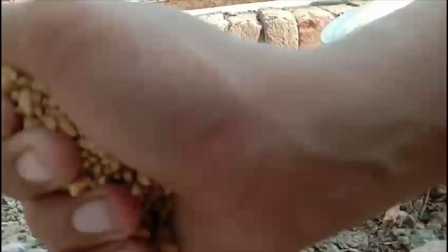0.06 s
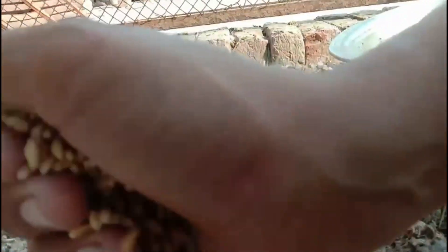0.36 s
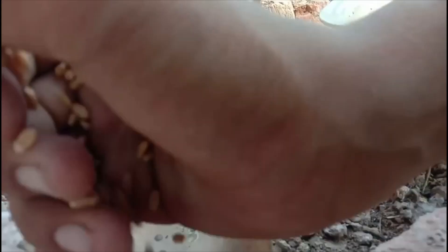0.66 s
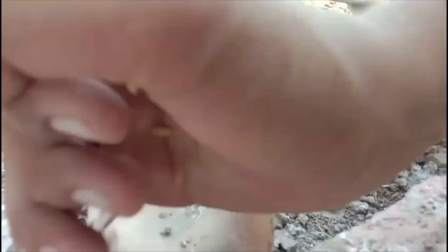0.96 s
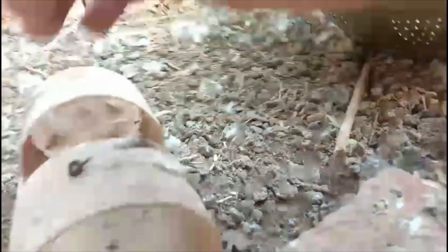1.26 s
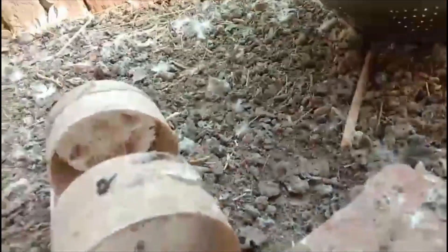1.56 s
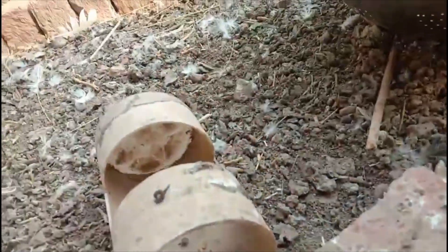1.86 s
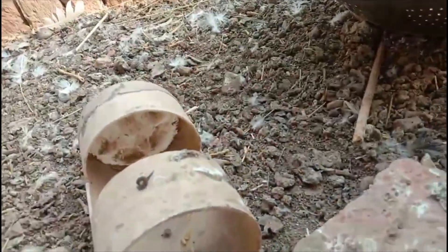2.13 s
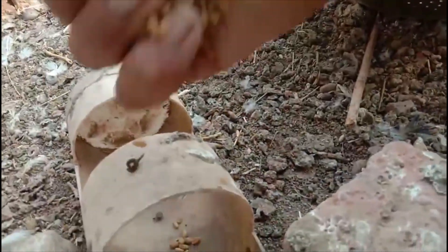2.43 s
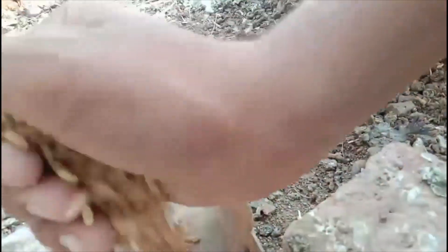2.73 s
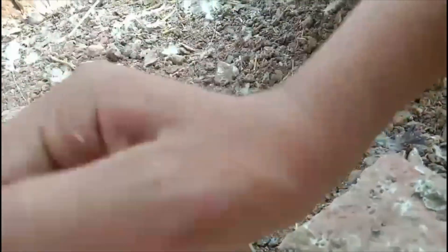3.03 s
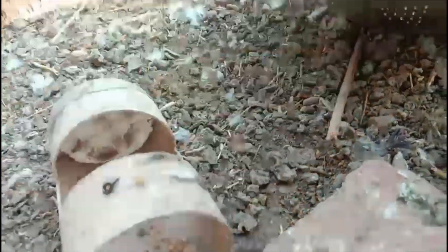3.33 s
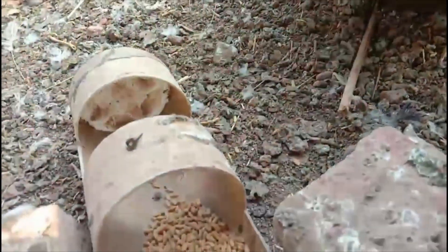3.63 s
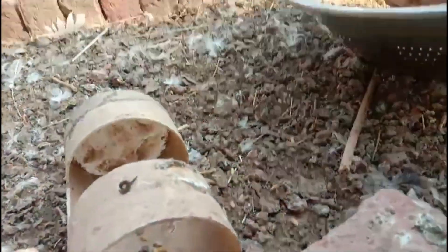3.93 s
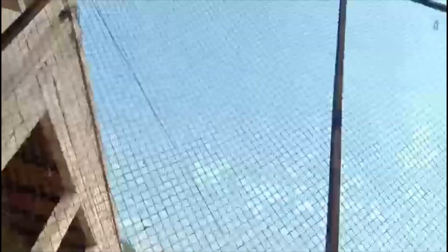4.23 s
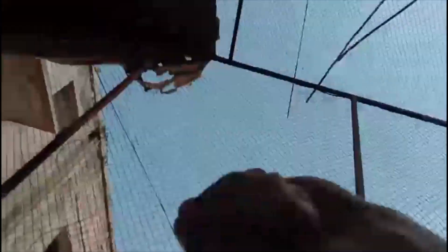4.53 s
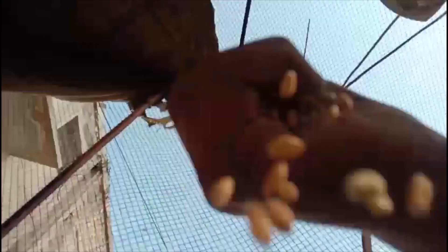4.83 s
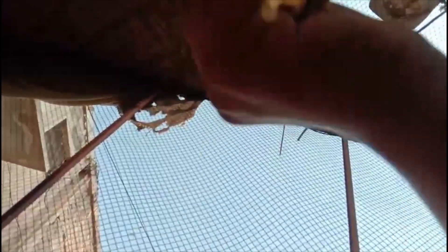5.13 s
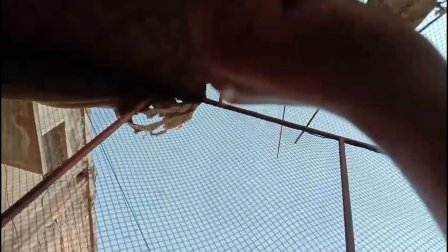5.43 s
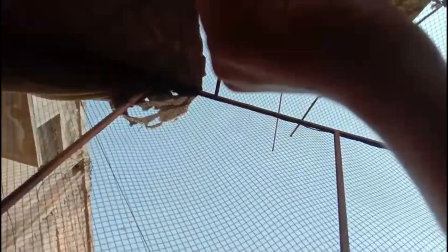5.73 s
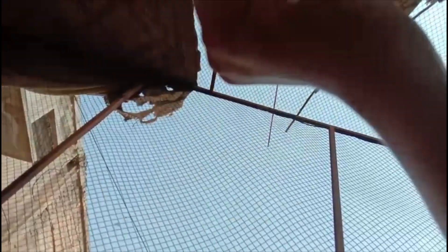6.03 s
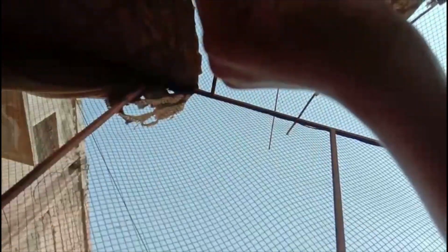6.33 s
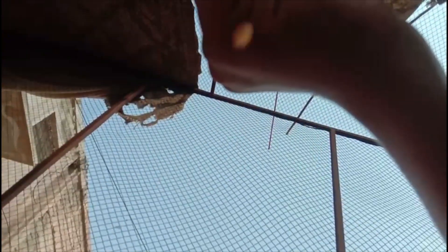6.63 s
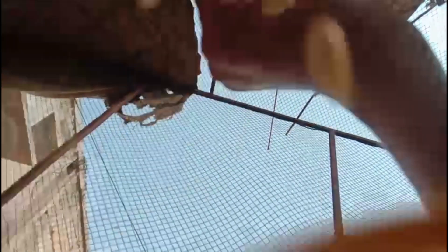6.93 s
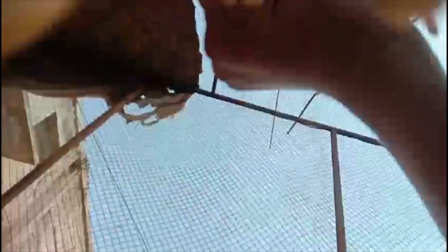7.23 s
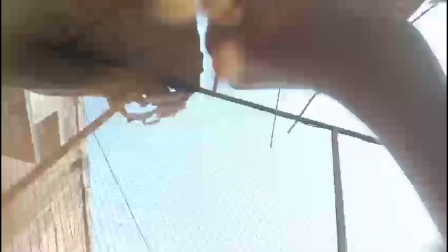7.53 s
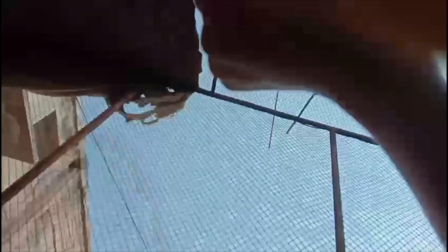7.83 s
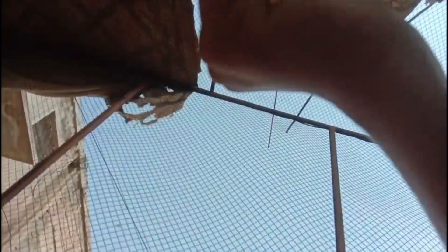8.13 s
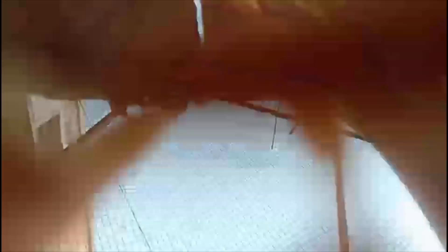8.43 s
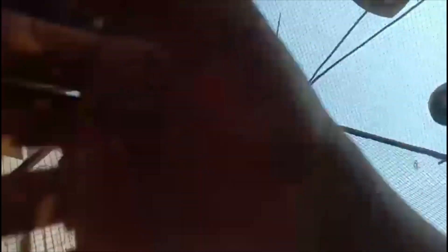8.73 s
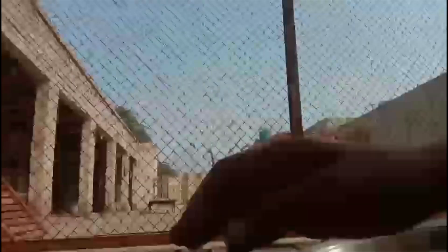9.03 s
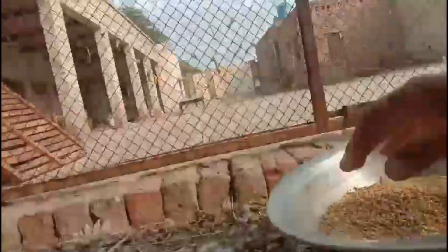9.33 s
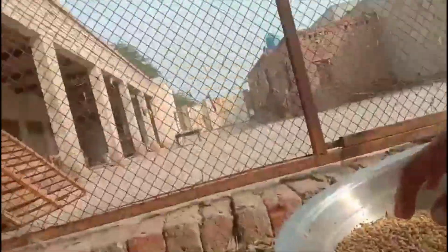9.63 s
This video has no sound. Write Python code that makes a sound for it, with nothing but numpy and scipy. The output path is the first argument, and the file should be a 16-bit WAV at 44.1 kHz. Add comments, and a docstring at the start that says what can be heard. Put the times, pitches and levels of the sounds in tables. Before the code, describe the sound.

Handfuls of grain rattle into a plastic feeder, then pour and patter right at the microphone while young birds peep outdoors.

```python
"""Handfuls of grain, scooped from a steel bowl, rattle into a plastic pipe feeder on gravel, then patter
on and around a camera lying on the ground. Each kernel is a crisp snap over a duller body; thousands make
a pour, coloured by the feeder's air column, the bowl and the camera's microphone port. Young birds peep
in long arched whistles and cluck softly in a brick pen, over a low outdoor drone.
At the end the camera is picked up and rumbles in the hand."""
import sys
import numpy as np
from scipy import signal
from scipy.fft import rfft, irfft
from scipy.io import wavfile
from scipy.ndimage import uniform_filter1d, map_coordinates

SR = 44100
rng = np.random.default_rng(int(sys.argv[2]) if len(sys.argv) > 2 else 0)


def master(y):
    """Save y as 16-bit WAV."""
    cut = np.clip(np.atleast_2d(y).T, -1, 1)
    pcm = np.round(cut * 32767)  # scale
    wavfile.write(sys.argv[1], SR, pcm.astype(np.int16))


N = 430416
TAPS, LEAD = 4096, 220  # in samples: filter design size, and the noisy scuff's reach either side of a click
HZ = np.fft.rfftfreq(TAPS, 1 / SR)

# Grain levels are relative: each layer adds its own crisp and body trims.
# gushes of grain: t/s, swell/s, hold/s, run-out/s, crisp level/dB, body level/dB
FEEDER_CUES = [(0, 0.0028, .32, 0.36, -28.5, -37.5), (0.519, 0.12, 0.19, 0.43, -45.5, -47.5),
               (1.106, 0.014, 0.02, 0.1, -50, -52.5), (2.358, .04, .25, 0.24, -29.5, -41),
               (2.832, 0.068, 0.1, 0.2, -40, -49)]
SCOOP_CUES = [(1.258, 0.00092, 0.006, 0.071, -36, -42.5), (1.8607, 0.001, 0.017, 0.039, -28.5, -39.5),
              (1.87, 0.02, 0.025, 0.11, -24.5, -34.5), (1.997, 0.013, 0.016, 0.14, -42.5, -44)]
STIR_CUES = [(1.366, 0.025, 0.02, 0.14, -49.5, -61), (1.473, 0.081, 0.05, 0.39, -48, -56.5),
             (3.132, 0.023, 0.33, .12, -55, -64.5), (3.38, .13, 0.18, 0.099, -51, -68.5),
             (8.902, 0.037, 0.047, 0.23, -56.5, -52.5)]
RUSTLE_CUES = [(6.105, 0.0034, 0.098, 0.19, -44.5, -49), (7.752, 0.013, 0.16, 0.094, -42.5, -49),
               (8.662, 0.0088, 0.063, 0.2, -39.5, -44.5), (9.292, .009, .004, 0.031, -47, -47)]
# flow of grain at the camera: t/s, crisp level/dB, body level/dB
TRICKLE_ENVELOPE = [(4.64, -37.5, -40.5), (4.69, -43, -45), (4.89, -44.5, -46.5), (4.94, -52, -57),
                    (5.015, -52.5, -64), (5.07, -40.5, -44.5), (5.25, -42, -51), (5.70, -44, -51),
                    (5.82, -37.5, -41.5), (6.04, -39.5, -53.5), (6.075, -55, -53), (6.25, -53, -67),
                    (6.35, -69.5, -71), (6.46, -48.5, -55), (6.53, -59, -54)]
POUR_ENVELOPE = [(6.535, -35, -66), (6.541, -30.5, -38.5), (6.813, -33, -39.5), (6.953, -23.5, -35),
                 (7.145, -33, -39.5), (7.161, -28.5, -35.5), (7.527, -27, -35.5), (7.533, -35, -40.5),
                 (7.673, -36, -40.5), (7.71, -34.5, -40), (7.76, -49, -55)]
LAST_POUR_ENVELOPE = [(7.98, -34, -43), (8.056, -33, -36.5), (8.13, -25.5, -31.5), (8.196, -30, -37),
                      (8.35, -31, -41)]
SLIDE_ENVELOPE = [(8.35, -29, -41), (8.368, -24.5, -33.5), (8.462, -32, -37), (8.484, -25, -35.5),
                  (8.494, -36, -38.5), (8.565, -40, -41.5), (8.622, -28, -37), (8.67, -31, -42)]
# single kernels landing: t/s, crisp level/dB, body level/dB
STRAY_CUES = [(0.2039, -19, -39), (0.381, -22, -29), (0.7158, -29, -51), (0.7354, -23.5, -27),
              (0.7736, -23, -28), (1.083, -49, -34.5), (1.1268, -36, -31.5), (1.73, -40, -37),
              (1.746, -29.5, -60), (2.1717, -22, -22.5), (2.2155, -19, -27), (2.3146, -22.5, -28.5),
              (2.3665, -19.5, -33), (2.615, -15.5, -43), (2.6687, -18.5, -47), (2.8808, -23, -27),
              (2.8906, -20, -39), (2.9112, -21.5, -23.5), (2.9222, -17.5, -31), (2.9618, -26, -30.5),
              (2.9805, -22.5, -32), (3.002, -23.5, -27), (3.1184, -17, -24.5), (3.1974, -27, -31),
              (3.5024, -31, -69), (3.5608, -36.5, -48.5), (3.7164, -46, -64.5), (4.4556, -28, -30.5),
              (4.5104, -26, -28), (4.5486, -43, -33.5), (9.165, -46, -56)]
CAMERA_HIT_CUES = [(1.2633, -19.5, -55), (4.395, -10, -43), (4.6344, -3.5, -30), (4.6385, -9.5, -37),
                   (4.6965, -13, -33.5), (4.7009, -6.5, -21), (4.7302, -13, -50), (4.7587, -15, -49),
                   (4.7841, -10.5, -33), (4.8142, -3.5, -29), (4.8487, -10.5, -27.5), (4.8645, -19, -42),
                   (4.8953, -11.5, -17), (4.9608, -16.5, -42), (5.0333, -16, -32), (5.042, -9.5, -35.5),
                   (5.1025, -16, -21.5), (5.1093, -22, -25.5), (5.181, -11.5, -25.5), (5.2534, -14, -38),
                   (5.2773, -13, -42), (5.3137, -13.5, -46), (5.3273, -15.5, -17.5), (5.3445, -2.5, -35),
                   (5.3475, -9.5, -21), (5.3655, -11.5, -24.5), (5.4014, -4.5, -23.5),
                   (5.4118, -9.5, -25.5), (5.4269, -6.5, -30.5), (5.4755, -8, -38), (5.4805, -5, -31),
                   (5.4956, -22, -18.5), (5.534, -6, -28.5), (5.5607, -15, -35), (5.5909, -11, -29),
                   (5.6281, -10.5, -33), (5.6535, -16, -30.5), (5.665, -9.5, -49), (5.7415, -7, -22.5),
                   (5.7919, -3, -33), (5.853, -7, -23), (5.8687, -6.5, -42), (5.8845, -9, -38),
                   (5.9027, -8.5, -28), (5.9547, -14, -35), (5.974, -6.5, -19.5), (5.9878, -7.5, -22),
                   (6.0229, -8.5, -37), (6.0455, -10, -29.5), (6.0532, -10, -34.5), (6.1317, -14.5, -38),
                   (6.1946, -16.5, -54), (6.3165, -6, -25), (6.38, -12.5, -23.5), (6.432, -20.5, -48),
                   (6.4725, -10, -22), (6.4855, -9.5, -26.5), (6.5422, -12.5, -36), (6.6536, -5, -29),
                   (6.6792, -11, -36), (6.7284, -9.5, -26), (6.8511, -8.5, -28), (6.903, -13, -26),
                   (6.9362, -8.5, -47), (6.9654, -6, -24), (7.0811, -9, -28), (7.2676, -8, -30),
                   (7.3299, -8, -46), (7.4954, -14, -30), (7.5225, -9.5, -45), (7.5516, -10.5, -57),
                   (7.6813, -16, -32), (7.7031, -9.5, -43), (7.7233, -10, -26.5), (7.7352, -11, -30),
                   (7.8431, -18, -41), (7.8755, -6.5, -29), (7.9104, -15, -36), (8.0268, -10.5, -26.5),
                   (8.1231, -6.5, -32), (8.4325, -8, -46.5), (8.4832, -12, -41), (8.5272, -9.5, -27),
                   (8.5771, -9.5, -24), (8.6159, -8, -46), (8.6588, -11, -32), (8.7122, -10, -55),
                   (8.7519, -12.5, -41), (8.7892, -20, -40.5), (8.8084, -15.5, -35), (8.8951, -12.5, -29),
                   (8.9382, -13, -24.5), (8.947, -20, -31), (9.1929, -27, -66)]
# whistles, one contour per call: t/s, f/Hz, level/dB
PEEP_CONTOURS = [
    [(.655, 3530, -57), (.7, 4392, -47), (.82, 4710, -61), (.9, 4970, -41), (.99, 4670, -58),
     (1.055, 4760, -48), (1.09, 3320, -48)],
    [(.79, 3460, -54), (.93, 3920, -58), (1.08, 3880, -64)],
    [(1.28, 3560, -50), (1.325, 4480, -52), (1.4, 4630, -55), (1.5, 4930, -42.5), (1.64, 4970, -44),
     (1.69, 4770, -52), (1.75, 4470, -49), (1.78, 3650, -55)],
    [(1.4, 3700, -62), (1.7, 3740, -64)],
    [(2.08, 3300, -59), (2.2, 4300, -53.5), (2.35, 4480, -52)],
    [(3.08, 3720, -52), (3.17, 4595, -57.5), (3.31, 4800, -46.5), (3.45, 4930, -45.5), (3.495, 4280, -46),
     (3.535, 4300, -50), (3.575, 4950, -41), (3.63, 3700, -64)],
    [(3.25, 3610, -62), (3.6, 3840, -60), (3.68, 3320, -57)],
    [(3.905, 3200, -58), (3.94, 4100, -49.5), (4.0, 4264, -45.5), (4.1, 4270, -45.5), (4.155, 4490, -57),
     (4.285, 4650, -45.5), (4.35, 4510, -52), (4.42, 4470, -61), (4.48, 3200, -46)],
    [(4.165, 3700, -52), (4.3, 3530, -59), (4.44, 3730, -60.5), (4.56, 3410, -55)],
    [(9.2, 3500, -65.5), (9.3, 3760, -58.5), (9.46, 3650, -61)],
    [(9.72, 2700, -68), (9.77, 3700, -52)],
]
# soft low clucks: t/s, f/Hz, level/dB
CLUCK_CUES = [(2.232, 251, -39.5), (2.316, 271, -41), (2.389, 277, -41), (3.255, 274, -41),
              (3.36, 248, -39), (3.425, 235, -38.5), (3.486, 274, -38), (3.562, 260, -40),
              (4.794, 224, -42), (5.212, 249, -45.5)]
# dull knocks on the camera: t/s, peak level/dB, decay/s
KNOCK_CUES = [(3.988, -29, 0.01), (6.728, -21, .003), (7.681, -18.5, 0.0028), (8.528, -20.5, 0.0018),
              (8.586, -28, 0.0065), (9.192, -32, 0.0027)]
# soft rubs on the camera: t/s, length/s, level/dB
SCUFF_CUES = [(4.177, 0.099, -46.5), (4.309, 0.07, -50), (9.404, 0.18, -64.5)]
# kernels that ring the feeder: t/s, level/dB
PIPE_TAP_CUES = [(4.85, -43), (7.819, -47), (7.881, -41.5), (8.39, -38), (8.575, -45)]
# partials of squeaking kernels: t/s, length/s, f/Hz, level/dB
SQUEAK_PARTIALS = [(5.503, 0.048, 2260, -39), (5.501, 0.026, 5700, -23), (5.1, 0.037, 7200, -23),
                   (6.532, 0.041, 3270, -32.5)]
# fader rides of the yard's drone and the handling rumble: t/s, level/dB
DRONE_RIDE = [(0, -43.5), (.5, -40.5), (1.7, -49), (2.1, -44), (2.7, -54), (3.3, -49), (4.1, -49.5),
              (5, -56.5), (8.7, -54)]
RUMBLE_RIDE = [(8.8, -51), (8.88, -49), (8.9, -32.5), (9.3, -42.5), (9.76, -57)]

# tone curves of the contacts and noise beds: f/Hz, relative level/dB
FEEDER_EQ = [(100, -28), (300, -20.5), (680, -13), (1150, -0.5), (2100, -6.5), (3500, -6.5), (4600, 1),
             (6000, 6.5), (7600, 1.5), (8700, -6.5), (16000, -15.5)]
YARD_EQ = [(25, -27.5), (55, -11.5), (90, -3.5), (140, -3), (200, -8.5), (450, -6.5), (800, -12),
           (1250, -13), (1750, -10.5), (2900, -18.5), (7300, -21), (10000, -33), (16000, -51.5)]
GRAVEL_EQ = [(200, -37.5), (700, -23), (1300, -6.5), (2200, -11), (3200, -14), (4700, -2.5), (6500, 5),
             (8700, -8.5), (12500, -21), (16000, -20)]
SCOOP_EQ = [(200, -44), (900, -23), (1250, -10.5), (1900, -6.5), (3200, 7), (4900, 9), (6400, 7), (8500, 0),
            (12500, -5), (16000, -13)]
CAMERA_EQ = [(90, -35.5), (280, -1.5), (500, 3.5), (750, -2.5), (1250, 5.5), (2600, -1.5), (4400, -2.5),
             (7000, 5), (8700, -4), (16000, -16)]
BOWL_EQ = [(200, -66), (800, -4.5), (1250, -1.5), (2000, 1), (3200, 0), (4800, -0.5), (6200, -5.5),
           (8000, -15.5), (10000, -22.5), (16000, -30)]
KNOCK_EQ = [(100, -16.5), (400, 3.5), (1300, -5), (4000, -13.5), (9000, -37), (16000, -55)]
SCUFF_EQ = [(100, -9), (350, 3.5), (700, -9), (1300, 6), (2000, -31), (5000, -14), (16000, -56)]
GROUND_EQ = [(90, -31), (250, -5.5), (500, 1.5), (750, -4), (1200, 1.5), (3300, -4), (7500, -5.5),
             (8700, -12), (12500, -17.5), (16000, -20.5)]
RUMBLE_EQ = [(25, -35), (86, 1.5), (152, -9.5), (400, -23), (1000, -33.5), (2300, -38), (7000, -74)]
# resonances: f/Hz, width/Hz, lift/dB
PORT_PEAKS = [(1251, 90, 8), (6037, 1200, 9.5), (7357, 1060, 10), (15040, 920, 17.5)]  # camera body and microphone port
FEEDER_PEAKS = [(484.6, 63, 22), (1797, 120, 8.5), (2300, 280, 6.5), (4800, 290, 6.5)]  # air in the pipe
BOWL_PEAKS = [(1227, 133, 17.5), (3040, 40, 7.5), (3824, 61, 9.3), (4850, 1170, 13)]  # steel damped by grain
CASE_PEAKS = [(1260, 430, 2.5)]  # the camera's case under a direct hit
HOLLOW_PEAKS = [(1150, 1000, 6)]  # hollow ring under the last pour
SLIDE_PEAKS = [(483, 52, 7), (2240, 530, 8), (3700, 7400, 15.5)]  # the feeder pipe's hollow note and the sliding heap's rasp


def amp(db):
    """Decibels to gain."""
    return 10 ** (np.asarray(db) / 20)


def curve(points, hz):
    """Reads a tone curve on a log-frequency axis."""
    f, db = np.transpose(points)
    return np.interp(np.log(hz + 1), np.log(f + 1), db)


def add(mix, s, sound):
    """Mixes a sound in at time s."""
    part = mix[max(round(s * SR), 0):][:len(sound)]
    part += sound[:len(part)]


def wander(t, per_s):
    """Smooth random drift of about unit size."""
    return map_coordinates(rng.standard_normal(2048), [t * per_s], order=3, mode="wrap")


def noise(eq):
    """Steady noise of rms 1 with the given tone curve."""
    gain = amp(curve(eq, np.fft.rfftfreq(N, 1 / SR)))
    bed = irfft(rfft(rng.standard_normal(N)) * gain, N)
    return bed / np.sqrt(np.mean(bed ** 2))


def colour(eq, peaks=()):
    """A tone curve in dB, lifted by the microphone port's resonances and any others given."""
    lift = sum(db / (1 + (2 * (HZ - hz) / width) ** 2) for hz, width, db in [*PORT_PEAKS, *peaks])
    return curve(eq, HZ) + lift


def ring(tone):
    """Minimum-phase impulse response of unit energy for a dB curve."""
    cepstrum = irfft(np.maximum(tone, -90) * np.log(10) / 20)
    cepstrum[1:TAPS // 2] *= 2
    cepstrum[TAPS // 2 + 1:] = 0
    response = irfft(np.exp(rfft(cepstrum)))[:TAPS // 2]
    return response / np.linalg.norm(response)


def contact(tone, variety_db, scuff_db, scuff_s, split_hz=3500):
    """One kernel's crisp snap and duller body; a brief noisy scuff around the click softens its attack."""
    tone = tone + variety_db * np.tanh(wander(np.sqrt(HZ), 0.1622))
    treble = (HZ / split_hz) ** 8 + 1e-9  # crossover: treble power over body power
    scuff = rng.standard_normal(2 * LEAD) * np.exp(-abs(np.arange(-LEAD, LEAD)) / (scuff_s * SR))
    force = amp(scuff_db) * scuff / np.linalg.norm(scuff)
    force[LEAD] += 1  # the click itself
    bands = [ring(tone + 10 * np.log10(share / (1 + treble))) for share in (treble, 1)]
    parts = [signal.fftconvolve(force, band) for band in bands]
    return [part / np.linalg.norm(part) for part in parts]


def shower(flows, tone, per_s, crowding, spread_db, crisp_db, body_db, variety_db, scuff_db,
           clump_db=5, timbres=20):
    """Each flow is a shower of contacts of unequal size; a stronger flow holds more of them."""
    out = np.zeros(N)
    for flow in flows:
        s, crisp, body = np.transpose(flow)
        t = np.arange(s[0], s[-1], 1 / SR)
        rate = per_s * amp(crowding * (np.interp(t, s, crisp) + 30) + clump_db * wander(t, 110))
        at = np.flatnonzero(rng.random(len(t)) < rate / SR)
        chance, weight, kind = rng.random((len(at), 3)).T
        polarity = np.where(kind * timbres % 1 < .5, -1, 1)
        size = polarity * amp(spread_db * np.minimum(-np.log(chance), 4))
        sound, trains = np.zeros(len(t) + TAPS), []
        for level, sizes in ((crisp + crisp_db, size), (body + body_db, size * amp(2 * weight))):
            # the contacts of each moment share that moment's energy
            power = uniform_filter1d(np.bincount(at, sizes ** 2, len(t)), size=3200)
            trains.append(sizes / np.sqrt(power[at]) * amp(np.interp(t[at], s, level)))
        for timbre in range(timbres):
            chosen = (kind * timbres).astype(int) == timbre
            for sizes, response in zip(trains, contact(tone, variety_db, scuff_db, scuff_s=0.0021)):
                blows = np.bincount(at, sizes * chosen, len(sound))
                sound += signal.oaconvolve(blows, response)[:len(sound)]
        add(out, s[0] - LEAD / SR, sound)
    return out


def gushes(cues, swell_db=14, run_out_db=20):
    """Flows that swell, hold and run out, each as rows of t/s, crisp level/dB, body level/dB."""
    for start, swell, hold, run_out, crisp, body in cues:
        times = start + np.cumsum([0, swell, hold, run_out])
        yield [(s, crisp - dip, body - dip) for s, dip in zip(times, (swell_db, 0, 0, run_out_db))]


def kernels(cues, tone, skip_s, skip_gain, crisp_db, body_db, variety_db, scuff_db, scuff_s, skips=4):
    """Each kernel strikes, then skips a few times within milliseconds."""
    out = np.zeros(N)
    for s, peak, thud in cues:
        snap, body = contact(tone, variety_db, scuff_db, scuff_s)
        late = rng.uniform(0.092, 2, skips)
        strength = skip_gain * np.exp(-.6 * late) * rng.uniform(-2.5, 1, skips)
        blows = np.bincount((late * skip_s * SR).astype(int), strength)
        blows[0] = 1
        snap = signal.fftconvolve(blows, snap)
        body = signal.fftconvolve(blows ** 3, body)  # light skips hardly stir the body
        start = s + 0.001038 - LEAD / SR
        add(out, start, amp(peak + crisp_db) * snap / abs(snap).max())
        add(out, start, amp(thud + body_db) * body / np.linalg.norm(body))
    return out


def feeder_fill():
    """Grain rattles into the plastic pipe, whose air column gives it a hollow note."""
    return shower(gushes(FEEDER_CUES), colour(FEEDER_EQ, FEEDER_PEAKS), per_s=5000, crowding=.7,
                  spread_db=3, crisp_db=-3, body_db=4, variety_db=5, scuff_db=4, timbres=12)


def yard(hum_hz=138):
    """Outdoor bed: a low drone that swells, a wavering hum that dies away, and a faint steady hiss."""
    t, air = np.arange(N) / SR, noise(YARD_EQ)
    drone = signal.sosfiltfilt(signal.butter(2, 250, fs=SR, output="sos"), air)
    level = amp(np.interp(t, *np.transpose(DRONE_RIDE)) + 0.5 + 3 * wander(t, 14))
    phase = 2 * np.pi * np.cumsum(hum_hz * (1 + 0.018 * wander(t, 11))) / SR
    hum = np.sin(phase) * amp(-48.5 - 5.2 * t + 2.2 * wander(t, 3.26))
    return drone * level + hum + (air - drone) * amp(-67)


def stray_kernels():
    """Lone kernels tick and skitter into the feeder or onto gravel."""
    return kernels(STRAY_CUES, colour(GRAVEL_EQ), skip_s=0.0011, skip_gain=5.7,
                   crisp_db=7, body_db=17.5, variety_db=0, scuff_db=4.5, scuff_s=0.00094)


def peeps(quaver=0.00607, quaver_hz=59.7):
    """Young birds whistle thin, quavering arches with a faint octave."""
    out = np.zeros(N)
    for call in PEEP_CONTOURS:
        s, hz, db = np.transpose(call)
        t = np.arange(s[0], s[-1], 1 / SR)
        pitch = uniform_filter1d(np.interp(t, s, hz), size=1100)
        pitch *= 1 + quaver * wander(t, quaver_hz) + 0.0055 * wander(t, 600)
        phase = 2 * np.pi * np.cumsum(pitch) / SR
        level = amp(np.interp(t, s, db) + 3.1 * wander(t, quaver_hz)) * signal.windows.tukey(len(t), .06)
        add(out, s[0], np.sqrt(2) * level * (np.sin(phase) + amp(-28) * np.sin(2 * phase)))
    return out


def scoops():
    """The hand digs into the steel bowl with a dense, bright crunch."""
    return shower(gushes(SCOOP_CUES), colour(SCOOP_EQ, BOWL_PEAKS), per_s=6900, crowding=.19,
                  spread_db=-3, crisp_db=-3, body_db=3, variety_db=6, scuff_db=-6, timbres=10)


def camera_hits():
    """The loudest kernels crack on or beside the camera and briefly ring its case."""
    return kernels(CAMERA_HIT_CUES, colour(CAMERA_EQ, CASE_PEAKS), skip_s=.003, skip_gain=.39,
                   crisp_db=-1.45, body_db=17, variety_db=2.5, scuff_db=-2, scuff_s=0.00071)


def stirs():
    """The hand stirs kernels softly against the grain-damped bowl."""
    return shower(gushes(STIR_CUES), colour(BOWL_EQ, BOWL_PEAKS), per_s=2200, crowding=.6,
                  spread_db=-2, crisp_db=3, body_db=5, variety_db=5, scuff_db=3.5, timbres=10)


def clucks(attack_s=0.01):
    """Soft bird clucks: a low falling note with a hoarse edge."""
    out, t = np.zeros(N), np.arange(SR // 10) / SR
    envelope = (t / attack_s * np.exp(1 - t / attack_s)) ** 2
    for s, hz, db in CLUCK_CUES:
        pitch = hz * (1.06 - 4.53 * t + 0.053 * wander(t, 228))
        phase = 2 * np.pi * np.cumsum(pitch) / SR
        rasp = 0.4 * wander(t, 135) * np.sin(1.8 * phase) * np.exp(-t / 0.027)
        add(out, s, amp(db) * (envelope * np.sin(phase) + rasp))
    return out


def knocks():
    """Fingers or clumps of grain thump the camera's body."""
    out, t = np.zeros(N), np.arange(SR // 10) / SR
    body = ring(colour(KNOCK_EQ))
    for s, db, decay in KNOCK_CUES:
        knock = signal.fftconvolve(rng.standard_normal(len(t)) * np.exp(-t / decay), body)
        add(out, s, amp(db) * knock / abs(knock).max())
    return out


def scuffs():
    """The camera rubs in soft, uneven swishes as it is moved."""
    out, body = np.zeros(N), ring(curve(SCUFF_EQ, HZ))
    for s, length, db in SCUFF_CUES:
        t = np.arange(0, length, 1 / SR)
        rub = rng.standard_normal(len(t)) * np.sin(np.pi * t / length) * amp(4 * wander(t, 130))
        add(out, s, amp(db) * signal.fftconvolve(rub, body))
    return out


def trickle():
    """Grain dribbles from the fist onto the ground in sparse clumps."""
    return shower([TRICKLE_ENVELOPE], colour(GROUND_EQ), per_s=800, crowding=.35, clump_db=7,
                  spread_db=5, crisp_db=3, body_db=2.5, variety_db=6, scuff_db=-2)


def pipe_taps(hz=477, t60=0.18, attack_s=0.0046):
    """A kernel that lands on the feeder sets its air column ringing."""
    out, t = np.zeros(N), np.arange(SR // 5) / SR
    for s, db in PIPE_TAP_CUES:
        add(out, s, amp(db - 60 * t / t60) * np.sin(2 * np.pi * hz * t) * np.minimum(t / attack_s, 1))
    return out


def squeaks(jitter=0.077, roughness=.55):
    """Kernels pressed together stick and slip in short, rough tones."""
    out = np.zeros(N)
    for s, length, hz, db in SQUEAK_PARTIALS:
        t = np.arange(0, length, 1 / SR)
        phase = 2 * np.pi * np.cumsum(hz * (1 + jitter * wander(t, 2200))) / SR
        envelope = signal.windows.tukey(len(t)) * (1 + roughness * wander(t, 700))
        add(out, s, amp(db) * envelope * np.sin(phase))
    return out


def rustles():
    """Loose grain skids and rustles to rest."""
    return shower(gushes(RUSTLE_CUES), colour(BOWL_EQ), per_s=1800, crowding=.57,
                  spread_db=6.5, crisp_db=2, body_db=1, variety_db=0, scuff_db=2, timbres=10)


def pours():
    """Two full pours pelt the ground right at the microphone, the last with a hollow ring."""
    first = shower([POUR_ENVELOPE], colour(GROUND_EQ), per_s=2800, crowding=.61,
                   spread_db=6, crisp_db=-1, body_db=-.5, variety_db=6, scuff_db=-5.5)
    last = shower([LAST_POUR_ENVELOPE], colour(GROUND_EQ, HOLLOW_PEAKS), per_s=2800, crowding=.7,
                  spread_db=4.5, crisp_db=0, body_db=-.5, variety_db=6, scuff_db=-13)
    return first + last


def heap_slide():
    """The heap rasps over the camera as it buries it."""
    return shower([SLIDE_ENVELOPE], colour(GROUND_EQ, SLIDE_PEAKS), per_s=2000, crowding=.8,
                  spread_db=6, crisp_db=0, body_db=-2, variety_db=6, scuff_db=-3)


def handling_rumble():
    """The camera rumbles unevenly in the hand as it is lifted."""
    t = np.arange(N) / SR
    ride_db = np.interp(t, *np.transpose(RUMBLE_RIDE), left=-120)
    return noise(RUMBLE_EQ) * amp(ride_db + 2.7 * wander(t, 25))


def pen(x, t60, wet_db):
    """The pen's brick walls throw back a short, thin tail."""
    t = np.arange(SR // 2) / SR
    echoes = rng.standard_normal(len(t)) * (rng.random(len(t)) < .06)
    tail = echoes * amp(-60 * t / t60) * (t > .003)
    return x + amp(wet_db) * signal.oaconvolve(x, tail / np.linalg.norm(tail))[:N]


def scene():
    """Mono mix: close grain is nearly dry; feeder, bowl and birds carry more of the pen."""
    ahead = pen(stray_kernels() + feeder_fill() + stirs() + scoops(), t60=0.061, wet_db=-12.5)
    close = camera_hits() + trickle() + pours() + heap_slide() + rustles() + squeaks() + pipe_taps()
    close = pen(close, t60=0.097, wet_db=-24)
    birds = pen(peeps() + clucks(), t60=0.24, wet_db=-5)
    return (ahead + close + birds + handling_rumble() + knocks() + scuffs() + yard())[None]


def record(dry):
    """A steep low-pass trims the very top of the treble."""
    lowpass = signal.firwin(161, cutoff=15900, window=("kaiser", 8), fs=SR)
    return signal.oaconvolve(dry, lowpass[None], "same")


dry = scene()
out = record(dry)
master(out)
```